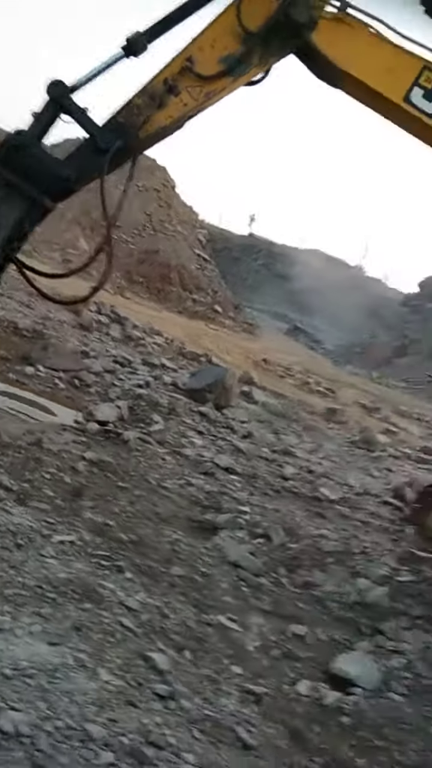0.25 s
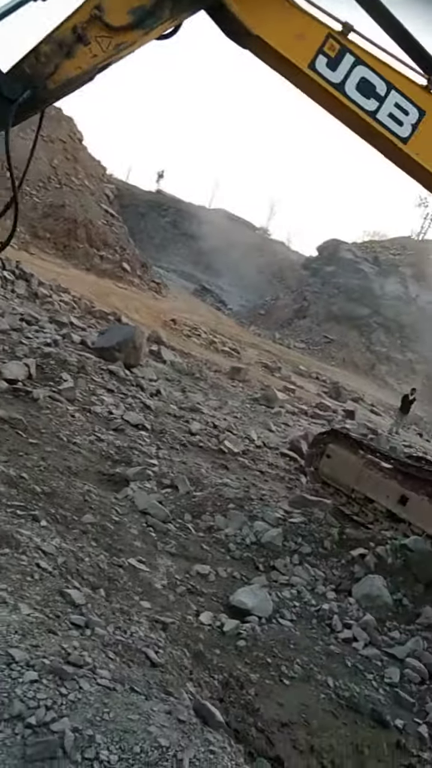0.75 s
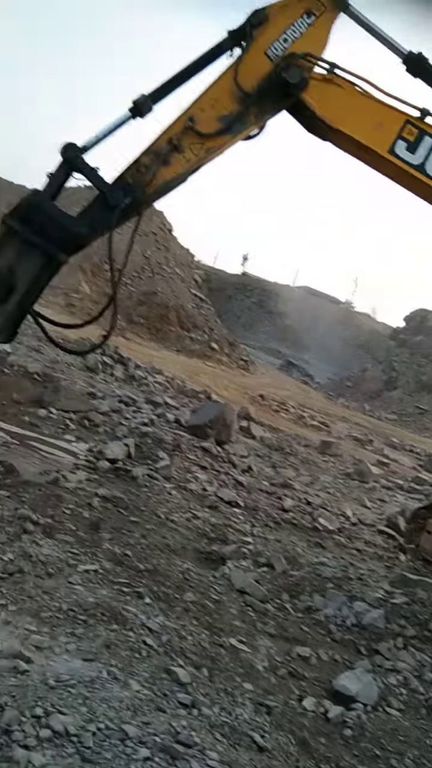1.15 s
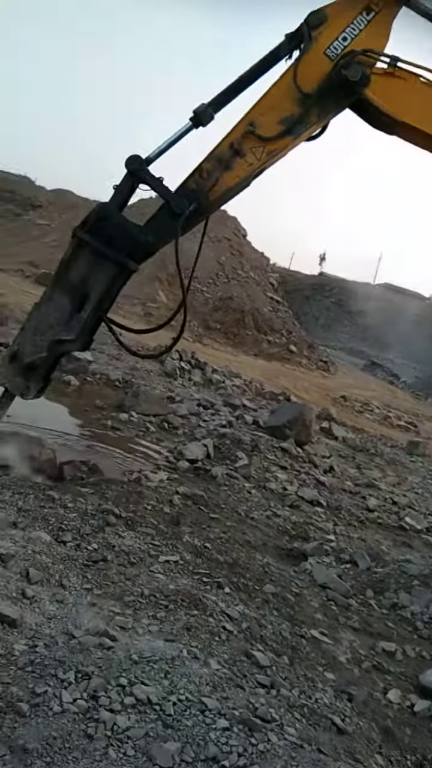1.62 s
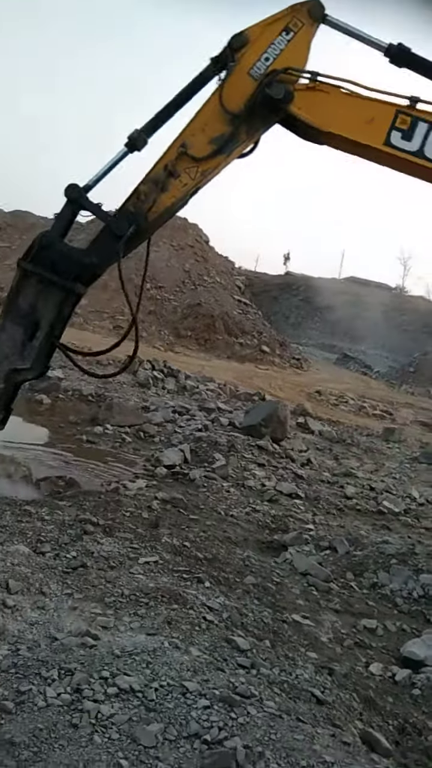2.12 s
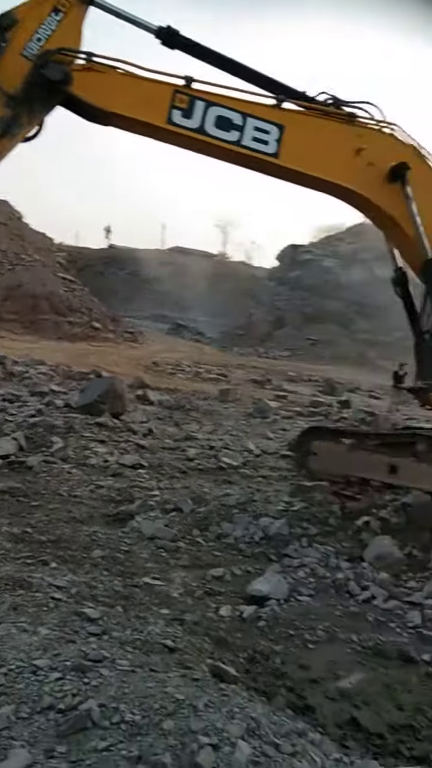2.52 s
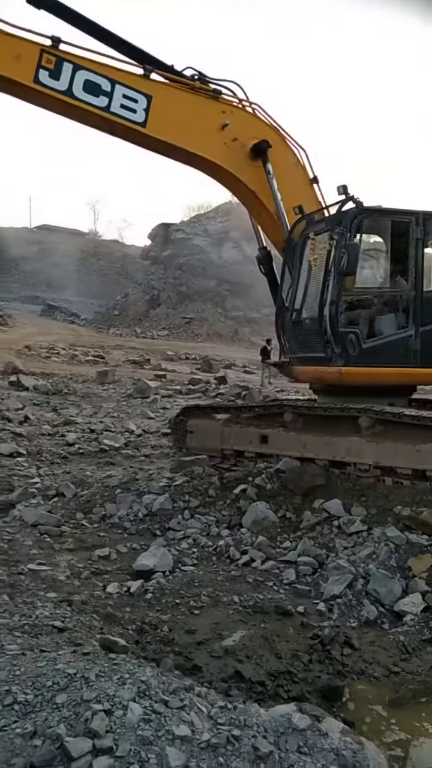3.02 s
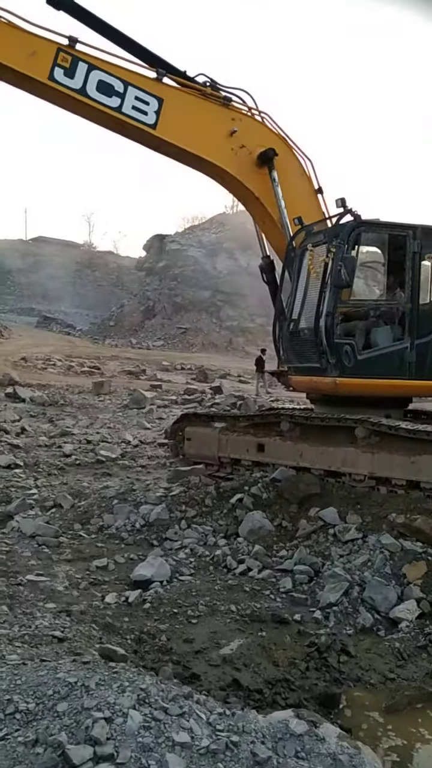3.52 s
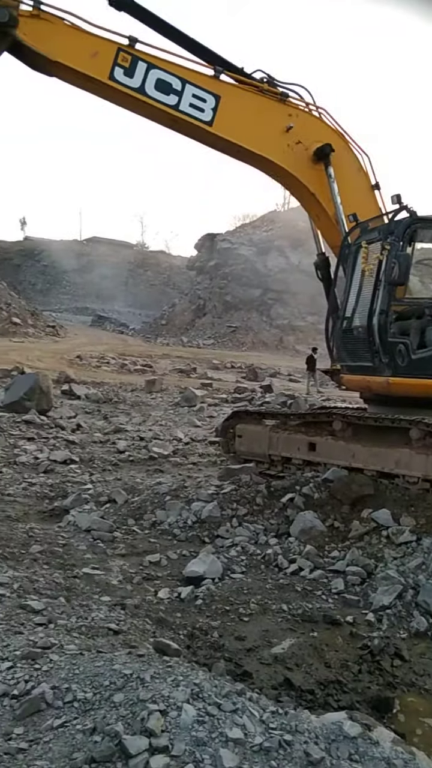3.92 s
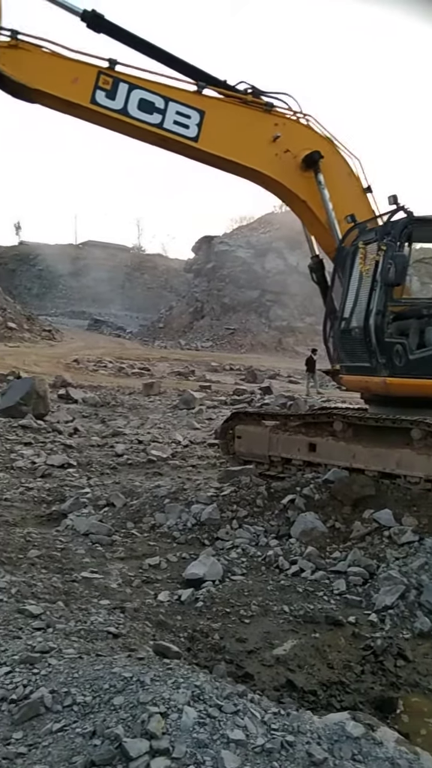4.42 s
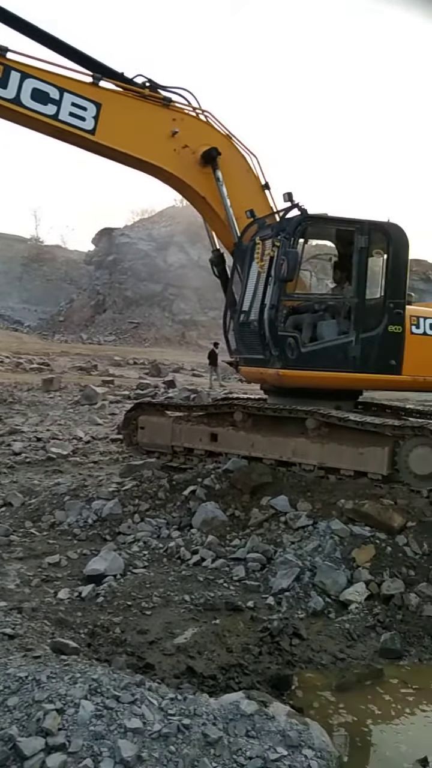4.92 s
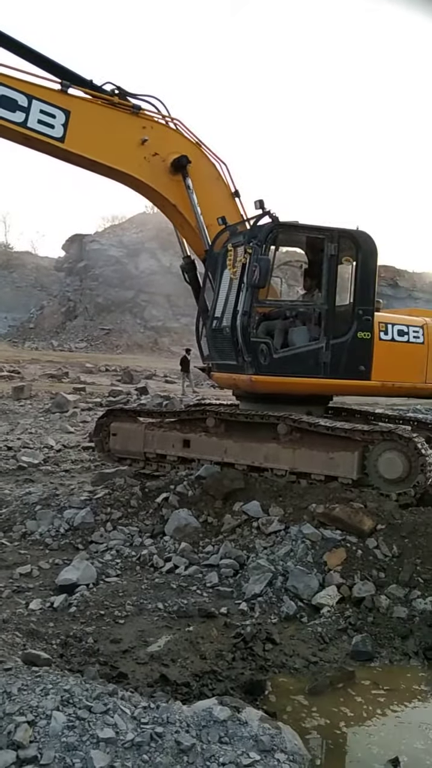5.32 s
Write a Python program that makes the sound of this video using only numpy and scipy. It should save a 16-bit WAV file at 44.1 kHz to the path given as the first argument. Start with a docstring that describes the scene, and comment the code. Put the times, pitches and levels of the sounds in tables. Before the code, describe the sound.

An excavator's hydraulic breaker strikes rock in an open quarry: one blow, a brief lull, then a quick run of cracking, ringing hits about five per second. The steel tool then knocks and drags through rubble, builds to a loud clatter, pauses, and hammers three more times. A faint low hum comes and goes. A small handheld microphone squashes the loudest peaks.

```python
"""A hydraulic breaker on an excavator boom hammers rock in an open quarry.
Each blow cracks, shakes boom and housing (filtered random contacts) and rings the steel tool (decaying sines).
Mostly between the runs of blows the tool knocks and drags through rubble: the same boom, other contacts.
Faint hollow ticks, thin pings and a low hum that comes and goes fill in. A small microphone limits the peaks."""
import sys
import numpy as np
from scipy import signal
from scipy.fft import rfft, irfft
from scipy.io import wavfile
from scipy.ndimage import uniform_filter1d

SR = 44100
rng = np.random.default_rng(int(sys.argv[2]) if len(sys.argv) > 2 else 0)


def to_wav(s):
    """Save 16-bit WAV."""
    ch = np.atleast_2d(s).T  # columns
    pcm = np.round(np.clip(ch, -1, 1) * 32767)  # PCM
    wavfile.write(sys.argv[1], SR, pcm.astype(np.int16))


N = 244755


def from_db(db):
    """dB to amplitude factor."""
    return 10 ** (np.asarray(db) / 20)


def rms_one(x):
    """Scales each row to an rms of 1."""
    return x / np.sqrt(np.mean(x ** 2, axis=-1, keepdims=True) + 1e-20)


def in_time(rows):
    """Interpolates every column after the time over all samples."""
    time_s, *columns = np.transpose(rows)
    return [np.interp(np.arange(N) / SR, time_s, column) for column in columns]


def add_at(out, time_s, sound):
    """Adds a sound from time_s on, cut at the end of the scene."""
    i = round(time_s * SR)
    out[..., i:i + sound.shape[-1]] += sound[..., :N - i]


def drift(rate_hz):
    """Slow chance of rms 1: noise through a double one-pole low-pass."""
    pole = np.exp(-2 * np.pi * rate_hz / SR)
    noise = rng.standard_normal(N + SR)
    return rms_one(signal.lfilter([1], [1, -2 * pole, pole * pole], noise)[SR:])


def held(t, hold_s, t60_s, rise_s):
    """Envelope: quick rise, level for a while, then an exponential fade."""
    fade = from_db(-60 * np.maximum(t - hold_s, 0) / t60_s)
    return (1 - np.exp(-t / rise_s)) * fade


def grains(per_s, spread_db):
    """Dense random contacts of uneven size and either sign."""
    sizes = from_db(spread_db * np.minimum(rng.exponential(1, N), 4))
    signs = rng.choice([-1, 1], N)
    return sizes * signs * (rng.random(N) < per_s / SR)


def streaky(x, patchy_db, lasting_frames):
    """Uneven noise: narrow bands swell a little or drop out by chance."""
    _, _, cells = signal.stft(x, nperseg=512)
    chance = uniform_filter1d(rng.standard_normal(cells.shape), size=lasting_frames, axis=1)
    chance = np.minimum(chance / chance.std(), 1.7)
    return signal.istft(cells * from_db(patchy_db * chance))[1][:N]


# crash spectrum: (frequency [Hz], relative density [dB per Hz])
CRASH_SPECTRUM = [(24, -41.5), (40, -31.5), (280, -2.5), (309, -3.5), (377, -5), (461, -4.5), (577, -4.5),
                  (778, -7.5), (1190, -2), (1960, -2), (2990, -7.5), (7340, -12), (15500, -41.5)]
# boom and housing resonances: (centre [Hz], width [Hz], added gain [dB])
BOOM_MODES = [(169, 73, 9), (255, 16, -2), (319.6, 9.6, 7.5), (475.8, 23.4, 8.5), (695.7, 20, 5.5),
              (776.6, 106, 10.5), (967, 77, 2), (1860, 17, -29), (2286, 50, -5), (4250, 300, -47)]
# gaps between the resonances: (centre [Hz], width [Hz], depth [0-1])
BOOM_GAPS = [(520, 160, .7), (1330, 150, .5), (3550, 350, .6), (5800, 300, .45), (9600, 500, .4)]
THUD_HZ, TREBLE_HZ, AIR_HZ = 550, 2650, 5600   # band edges


def through_boom(force, steel_db, gap_power=1):
    """Colours a shaking force by crash spectrum and resonances; returns thud, body, treble, air (body rms 1)."""
    hz = np.maximum(np.arange(N // 2 + 1) * SR / N, 10)
    spectrum_hz, spectrum_db = np.transpose(CRASH_SPECTRUM)
    gain = from_db(np.interp(np.log(hz), np.log(spectrum_hz), spectrum_db))
    for centre_hz, width_hz, db in BOOM_MODES:
        gain = gain * (1 + from_db(db) / (1 + (2 * (hz - centre_hz) / width_hz) ** 2))
    for centre_hz, width_hz, depth in BOOM_GAPS:
        gain = gain * (1 - depth / (1 + (2 * (hz - centre_hz) / width_hz) ** 2)) ** gap_power
    for centre_hz in STEEL_HZ[14:]:   # the force also keeps the high steel modes going
        gain = gain * (1 + from_db(steel_db) / (1 + ((hz - centre_hz) / 15) ** 2))
    low = 1 / (1 + (hz / THUD_HZ) ** 6)
    high = 1 / (1 + (TREBLE_HZ / hz) ** 6)
    air = 1 / (1 + (AIR_HZ / hz) ** 6)
    bands = np.array([low, 1 - low - high, high - air, air])
    y = irfft(rfft(force) * gain * bands, N)
    return y / np.sqrt(np.mean(y[1] ** 2))


# low hum: (time [s], level [dB])
HUM_LEVEL = [(0.0, -47), (0.15, -41), (0.4, -36.5), (0.62, -29), (0.83, -36), (1.05, -41.5), (1.2, -48.5),
             (1.6, -50), (2.3, -58), (2.49, -65), (2.77, -52), (2.94, -55), (3.25, -36.5), (3.45, -31.5),
             (3.8, -30), (4.36, -33.5), (4.6, -54), (4.84, -53), (5.05, -49.5), (5.55, -70)]
HUM_HZ = 70.3   # mean


def low_hum():
    """Low hum near 70 Hz that comes and goes, its pitch drifting by chance, in a band of low rumble."""
    pitch_hz = HUM_HZ * (1 + 0.0325 * drift(5.06))
    phase = 2 * np.pi * np.cumsum(pitch_hz) / SR
    tone = np.sqrt(2) * np.sin(phase) * from_db(2.0 * drift(10))
    low_band = signal.butter(2, [55, 110], "band", fs=SR, output="sos")
    rumble = rms_one(signal.sosfilt(low_band, rng.standard_normal(N)))
    return from_db(in_time(HUM_LEVEL)[0]) * (tone + from_db(1.5) * rumble)


# rubble shifting under the tool: (time [s], scrape [dB], rumble [dB], grit [dB])
RUBBLE_LEVEL = [(0.0, -17, -16, -23.5), (0.18, -28.5, -29, -56), (0.34, -45.5, -34.5, -63),
                (0.6, -33.5, -28, -57), (0.9, -54, -25.5, -48), (1.12, -70, -50, -41),
                (1.35, -33, -36.5, -53), (1.68, -37, -42, -38), (1.95, -22.5, -22, -25.5),
                (2.0, -28, -26, -35), (2.15, -28.5, -50, -40), (2.41, -64, -46.5, -68),
                (2.74, -76.5, -59.5, -75), (3.14, -29.5, -30.5, -54), (3.45, -41.5, -38, -53),
                (3.7, -39, -42, -52), (3.87, -16, -27, -37), (4.22, -36, -22.5, -43),
                (4.45, -22.5, -18.5, -26), (4.64, -7.5, -10.5, -19.5), (4.7, -29.5, -26, -41.5),
                (4.84, -75, -38, -55), (5.04, -57, -74, -82), (5.36, -47, -40, -38),
                (5.55, -16.5, -24, -49)]
# short slides of broken stone, most just after a hit: (peak time [s], scrape [dB], grit [dB])
STONE_SLIDES = [(0.77, -6.5, -15.5), (1.808, -2.5, -9.5), (2.27, -13, -14), (2.798, -30.5, -75),
                (3.002, -17.5, -53), (4.56, -3.5, -10), (5.1, -22.5, -30), (5.29, -48, -19.5),
                (5.46, -19, -47)]
SLIDE_RISE_DB_S, SLIDE_FALL_DB_S = 521, 338
SLIDE_RUMBLE_DB = -8   # re scrape


def rubble():
    """Stones grind and tumble in clumps; slides swell fast and settle."""
    scrape_db, rumble_db, grit_db = in_time(RUBBLE_LEVEL)
    power = from_db([rumble_db, scrape_db, grit_db]) ** 2
    t = np.arange(-SR // 5, SR // 4) / SR
    swell = from_db(np.minimum(SLIDE_RISE_DB_S * t, -SLIDE_FALL_DB_S * t))
    for peak_s, slide_db, slide_grit_db in STONE_SLIDES:
        levels = from_db([[slide_db + SLIDE_RUMBLE_DB], [slide_db], [slide_grit_db]])
        add_at(power, peak_s + t[0], (levels * swell) ** 2)
    stones = streaky(grains(per_s=5000, spread_db=3.5), patchy_db=6.5, lasting_frames=18)
    rumble, scrape, treble, air = through_boom(stones, steel_db=-30.5)
    parts = rms_one(np.array([rumble, scrape, treble + air]))
    clumps = from_db([1.3 * drift(60), 0.45 * drift(22.4), 2.0 * drift(45)])
    return np.sum(parts * np.sqrt(power) * clumps, axis=0)


# faint thin pings in the lulls: (time [s], frequency [Hz], level [dB])
PING_TONES = [(0.439, 7660, -50), (0.502, 5580, -40.5), (0.52, 7000, -45), (0.545, 4900, -47),
              (2.451, 8250, -55), (4.956, 8750, -48.5), (4.96, 7050, -55)]


def pings():
    """Single thin tones that flutter as they die."""
    out, t = np.zeros(N), np.arange(SR // 4) / SR
    envelope = held(t, hold_s=0.015, t60_s=0.17, rise_s=0.00093)
    for time_s, hz, db in PING_TONES:
        add_at(out, time_s, from_db(db) * envelope * np.sin(2 * np.pi * hz * t))
    return out * from_db(4.0 * drift(40))


# ticks about 22 ms before some blows: (time [s], hollow tone [dB], hiss [dB])
TICK_LEVELS = [(0.664, -24, -16), (0.85, -24, -24), (1.0354, -35, -30), (1.2097, -31, -30),
               (1.389, -26, -25.5), (5.04, -38, -21), (5.226, -60, -25.5), (5.405, -45, -24.5)]
TICK_HZ = 1473


def ticks():
    """Faint hollow ticks with a short hiss: a sine and band noise under one brief envelope."""
    out, t = np.zeros(N), np.arange(SR // 10) / SR
    envelope = held(t, hold_s=0.0054, t60_s=0.055, rise_s=0.0043)
    noise = rng.standard_normal((len(TICK_LEVELS), len(t)))
    hiss_band = signal.butter(2, [3500, 10000], "band", fs=SR, output="sos")
    hisses = signal.sosfilt(hiss_band, noise)
    for (time_s, tone_db, hiss_db), hiss in zip(TICK_LEVELS, hisses):
        tick = from_db(tone_db) * np.sin(2 * np.pi * TICK_HZ * t) + from_db(hiss_db) * hiss
        add_at(out, time_s, tick * envelope)
    return out


def crashes(hits, rise_s, treble_fade, crest_db, steel_db, gap_power):
    """Every hit shakes the boom: a short crack, then rattle whose treble fades treble_fade times as long."""
    power, cracks = np.zeros((4, N)), np.zeros((3, N))
    t = np.arange(SR // 2) / SR
    crack_shape = held(t, hold_s=.003, t60_s=.035, rise_s=.0003)
    for time_s, db, thud_db, treble_db, hold_s, t60_s, crack_db in hits:
        level_db = db - crest_db
        treble_shape = held(t, hold_s, treble_fade * t60_s, rise_s)
        parts = np.array([from_db(thud_db) * held(t, hold_s, t60_s, 3.2 * rise_s),
                          held(t, hold_s, t60_s, rise_s),
                          from_db(treble_db) * treble_shape,
                          from_db(2.6 * treble_db) * treble_shape])   # a dull hit is duller still on top
        add_at(power, time_s, (from_db(level_db) * parts) ** 2)
        crack_bands = from_db([[0], [treble_db - 2], [2.8 * treble_db]])
        add_at(cracks, time_s, crack_bands * from_db(level_db + crack_db) * crack_shape)
    contacts = streaky(grains(per_s=9000, spread_db=3.0), patchy_db=5.5, lasting_frames=12)
    rattle = through_boom(contacts, steel_db, gap_power)
    rattle = rattle * from_db([1.7 * drift(30), 0.8 * drift(37), 2.2 * drift(50), 2.5 * drift(45)])
    splinters = through_boom(rng.standard_normal(N), steel_db)[1:]   # no thud in the crack
    return np.sum(np.sqrt(power) * rattle, axis=0) + np.sum(cracks * splinters, axis=0)


# tool knocking on stone; level before crest_db, thud, treble and crack relative to it:
# (time [s], level [dB], thud [dB], treble [dB], fade t60 [s], crack [dB])
STONE_KNOCKS = [(0.145, -10, 6.5, -8.5, 0.2, 0), (0.2236, -3, -6, -8, 0.19, 0.5),
                (0.247, -6.5, -2, -6.5, 0.28, 3), (0.328, -27, 28.5, -8, 0.16, 3),
                (0.5423, -8, 8.5, -37, 0.46, -1), (0.742, 0.5, 18.5, 0, 0.12, 8),
                (1.631, -4.5, -12, -0.5, 0.31, 4.5), (2.1748, -11, 7, 2.5, 0.41, 2),
                (2.584, -26.5, -8, 4.5, 0.085, -10), (2.594, -6, -0.5, -5, 0.28, -24),
                (2.773, -25.5, 12.5, -19, 0.18, 3), (2.883, -4, -9, -11.5, 0.28, -27),
                (2.962, -12, -12, -7, 0.17, -4), (2.991, -11, -8, -8, 0.16, 9),
                (3.103, -13, 1, -2, 0.17, 2), (3.2, -13.5, -20, -7, 0.25, 10),
                (3.2828, -11, 7, -4, 0.17, 1), (3.341, -7, 9.5, -1.5, 0.24, 1.5),
                (3.662, -12, 17, -34, 0.23, -14), (3.7417, -1.5, 0, -17, 0.3, 3.5),
                (3.866, -8, -6, -8, 0.17, 14), (3.9536, -26, 10, 6, 0.42, 10),
                (4.108, -9, -18, 0.5, 0.78, -3), (4.1796, 0.5, -25, -4, 0.27, 5.5),
                (4.273, -6, -13, -27, 0.33, -9), (4.389, -9.5, 16, -24, 0.33, -12),
                (4.428, -1, -10, -25, 0.45, 0), (4.488, 2, -6, 1, 0.22, -5), (4.52, 8.5, -25, -5, 0.4, -7),
                (4.579, -3, -2, -5, 0.28, 15), (4.7237, -4.5, -6, -7, 0.27, 2.5),
                (5.355, -11.5, -16, -13, 0.17, -7)]
KNOCK_HOLD_S = 0.023


def knocks():
    """The tool knocks on stone: softer onsets, treble dying before the body."""
    hits = [(*row[:4], KNOCK_HOLD_S, *row[4:]) for row in STONE_KNOCKS]
    return crashes(hits, rise_s=0.0081, treble_fade=0.53, crest_db=13.0, steel_db=-9.5, gap_power=0.31)


# two tones sing on after some blows: (time [s], lower tone [dB], upper tone [dB])
SINGING_BLOWS = [(2.2268, -27.5, -26.5), (3.3154, -40, -50)]
# their pitches: (frequency [Hz])
SINGING_HZ = [5075, 6330]


def singing_tones():
    """Two steady tones hold level for a while, then drop away quickly."""
    out, t = np.zeros(N), np.arange(SR // 2) / SR
    sines = np.sin(2 * np.pi * np.outer(SINGING_HZ, t))
    envelope = held(t, hold_s=0.13, t60_s=0.17, rise_s=0.00267)
    for time_s, *tone_db in SINGING_BLOWS:
        add_at(out, time_s, from_db(tone_db) @ sines * envelope)
    return out


# modes of the steel tool and its housing: (mean frequency [Hz])
STEEL_HZ = [168, 243, 312, 465, 700, 785, 945, 985, 1513, 1790, 1934, 2135, 2210, 2820, 3935, 4045, 4160,
            4550, 5075, 5216, 5403, 6235, 6330, 6426, 7190, 7548, 7632, 8400, 8716, 8940, 10010, 10230,
            10362, 11350, 11450, 12110, 12695, 13860, 13995, 15015]
# their strengths before the upper dip: (level [dB])
STEEL_DB = [-6, -15, -1.5, -17.5, -20.5, -9, -23, -11.5, -9, -4.5, -3.5, -0.5, -3, -13.5, -15.5, 0.5, -3.5,
            -19, -4.5, -14, -17, -15, -3.5, -18, -1, -0.5, 5, -2, -2.5, -5.5, -26, -21, -28.5, -33, -21,
            -21.5, -35.5, -31, -27, -27.5]
# their decay: (frequency [Hz], t60 [s])
STEEL_T60 = [(170, 0.083), (800, 0.47), (2000, 0.2), (4000, 0.27), (6000, 0.073), (8500, 0.41),
             (15000, 0.34)]
# borders between housing, lower and upper steel modes: (frequency [Hz])
MODE_BORDERS_HZ = [3000, 7000]
# breaker blows; rattle before crest_db, thud, treble and crack relative to it:
# (time [s], rattle [dB], thud [dB], treble [dB], hold [s], crack [dB], punch [dB],
#  housing ring [dB], lower steel ring [dB], upper steel ring [dB])
BREAKER_BLOWS = [(0.0204, -3, -22, -2.5, 0.049, 3, -17, -19.5, -32, -20.5),
                 (0.6868, 9.5, 0, -5.5, 0.039, -16, -0.5, -2.5, -8, -4),
                 (0.8733, -3.5, -7, -2.5, 0.04, -18, -15, -16.5, -31, -18.5),
                 (1.0575, -13.5, -6, 2.5, 0.036, -17, -14, -21, -23, -18.5),
                 (1.2301, -14, -28, 0, 0.069, -22, -11.5, -20, -17.5, -22),
                 (1.3456, -15, -17, -3.5, 0.0082, 9, -27, -23, -34.5, -30),
                 (1.4112, -6.5, 2, -4, 0.061, 2.5, -7.5, -22, -31, -20),
                 (1.5789, -12, 3, 2.5, 0.037, -22, -8.5, -17, -16.5, -17),
                 (1.7725, 3, 1.5, -2.5, 0.08, 4.5, -10, -15.5, -8.5, -17),
                 (1.955, -30.5, -8, -4, 0.034, -4, -33, -28, -23.5, -50),
                 (2.014, -5, 0.5, -2, 0.076, 2, -9, -23, -24, -21.5),
                 (2.2268, -11, 3, -12, 0.12, 0, -27, -6.5, -17, -14),
                 (3.3154, -16.5, 2.5, 0, 0.091, 2, -38, -16.5, -32.5, -29),
                 (5.0629, -10.5, -4, 3.5, 0.052, 1, -13, -16, -16.5, -8.5),
                 (5.249, -11, 0, -2, 0.046, -4, -8, -11, -13.5, -11),
                 (5.4316, -7, -6, -1.5, 0.07, 3.5, -22, -15, -17.5, -16)]
UPPER_DIP_DB = -9.5   # modes from 7 to 9.5 kHz are struck more weakly
PUNCH_HZ, PUNCH_T60_S = 235, .07
BLOW_T60_S = 0.2   # rattle, after the hold


def tool_ring():
    """Each blow punches the housing and strikes all steel modes; each decays, and faster after a hold."""
    out, t = np.zeros(N), np.arange(SR // 2) / SR
    hz, mode_db = np.array([STEEL_HZ, STEEL_DB])[:, :, None]
    mode_t60_s = np.interp(hz, *np.transpose(STEEL_T60))
    group = np.searchsorted(MODE_BORDERS_HZ, hz)
    mode_db = mode_db + UPPER_DIP_DB * ((hz > 7000) & (hz < 9500))
    punch = held(t, 0.0011, PUNCH_T60_S, 0.0018) * np.sin(2 * np.pi * PUNCH_HZ * t)
    chance = rng.standard_normal((len(BREAKER_BLOWS), 3, len(STEEL_HZ), 1))
    wobble_steps = rng.standard_normal((len(BREAKER_BLOWS), len(STEEL_HZ), 51))
    for blow, (luck, phase, detune), steps in zip(BREAKER_BLOWS, chance, wobble_steps):
        time_s, _, _, _, hold_s, _, punch_db, *ring_db = blow
        # each mode's level and phase waver by chance, one step per 10 ms
        wobble = np.array([np.interp(t * 100, np.arange(51), row) for row in steps])
        level_db = np.array(ring_db)[group] + mode_db + 3.5 * luck + 2.5 * wobble
        size = from_db(level_db - 60 * t / mode_t60_s)
        pitch_hz = hz * (1 + .001 * detune)   # each mode is detuned slightly by chance
        angle = 2 * np.pi * pitch_hz * t + 2 * phase + .3 * wobble[::-1]
        ring = np.sum(size * np.sin(angle), axis=0)
        ring = ring * held(t, hold_s, 3.0 * BLOW_T60_S, 0.0026)
        add_at(out, time_s, ring + from_db(punch_db) * punch)
    return out


def hammer():
    """Blows shake the boom with a sharp onset and ring the tool."""
    hits = [(*row[:5], BLOW_T60_S, row[5]) for row in BREAKER_BLOWS]
    shake = crashes(hits, rise_s=0.00018, treble_fade=1.0, crest_db=12.5, steel_db=-6.0, gap_power=0.94)
    return shake + tool_ring()


def scene():
    """Sums all sources into one channel."""
    background = low_hum() + rubble() + pings() + ticks()
    return (background + knocks() + singing_tones() + hammer())[None]


LIMIT_DB, RELEASE_DB_S = -4, 173
CEILING = .68   # soft clip
CUTOFF_HZ = 15750


def record(dry):
    """A limiter holds the loud parts level, a soft clip rounds the peaks; deep bass and top are cut."""
    over_db = np.maximum(20 * np.log10(np.abs(dry) + 1e-9) - LIMIT_DB, 0)
    ramp_db = RELEASE_DB_S * np.arange(N) / SR
    cut_db = np.maximum.accumulate(over_db + ramp_db, axis=1) - ramp_db   # instant rise, linear release
    cut_db = signal.lfilter([.02], [1, -.98], cut_db)   # smoothing lets short onsets through
    out = CEILING * np.tanh(dry * from_db(-cut_db) / CEILING)
    # the microphone has no deep bass
    out = signal.sosfilt(signal.butter(3, 56, "high", fs=SR, output="sos"), out)
    return signal.sosfilt(signal.cheby2(16, 45, CUTOFF_HZ, fs=SR, output="sos"), out)


dry = scene()
out = record(dry)
to_wav(out)
```